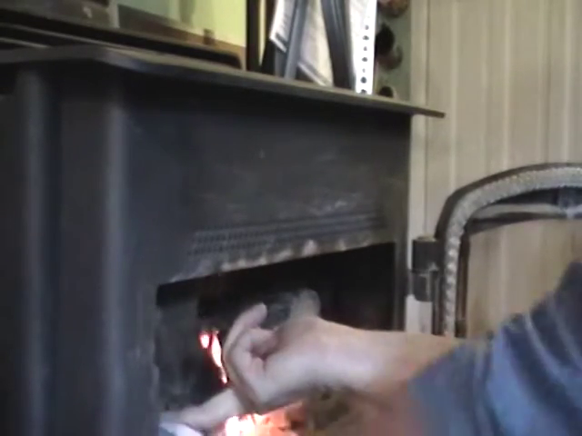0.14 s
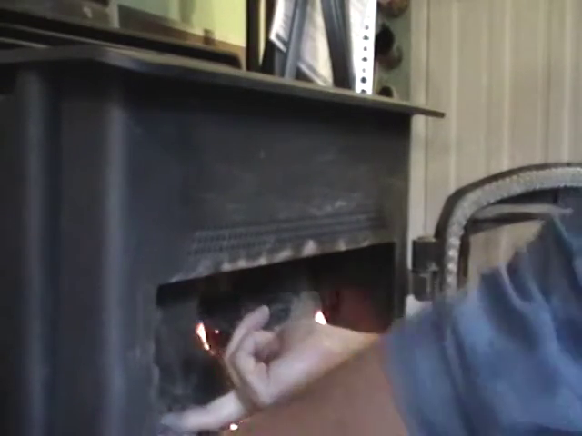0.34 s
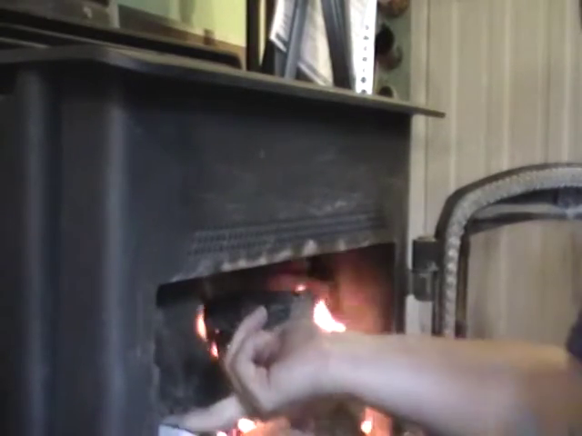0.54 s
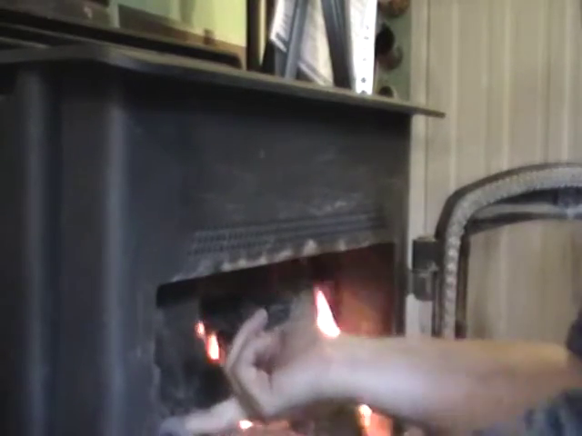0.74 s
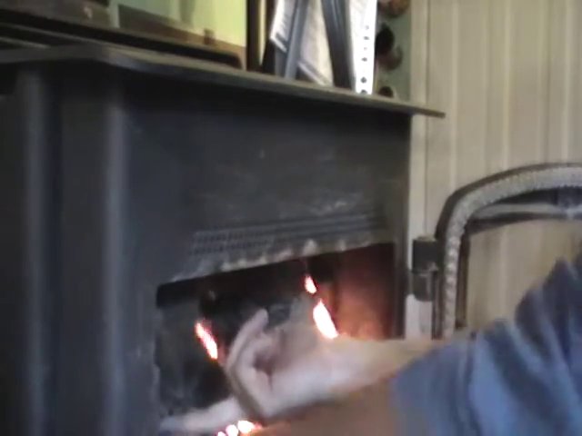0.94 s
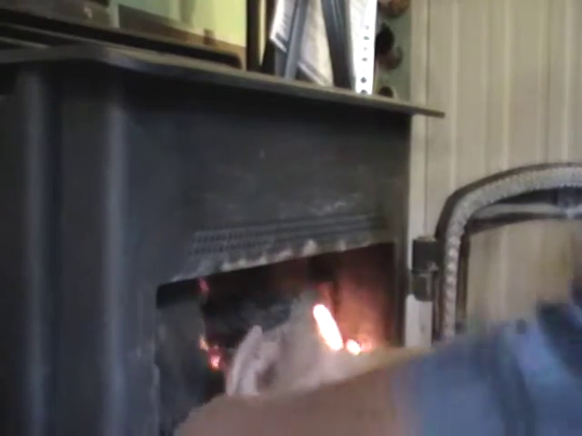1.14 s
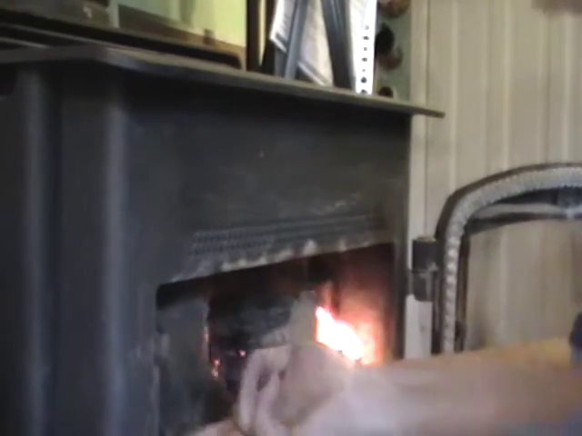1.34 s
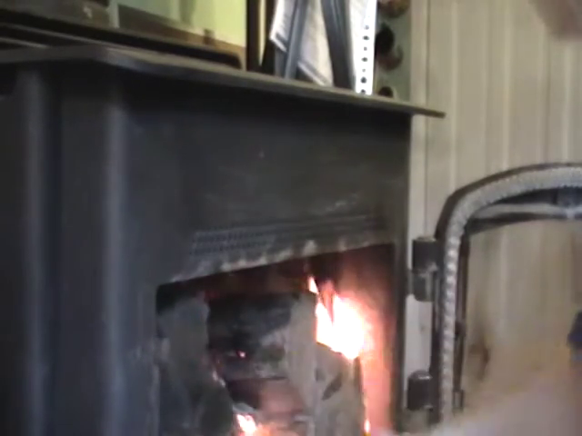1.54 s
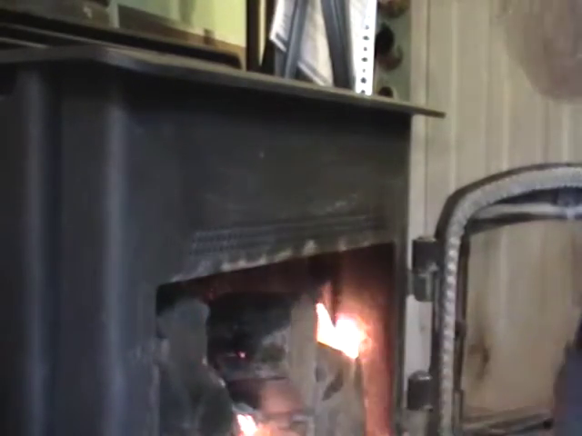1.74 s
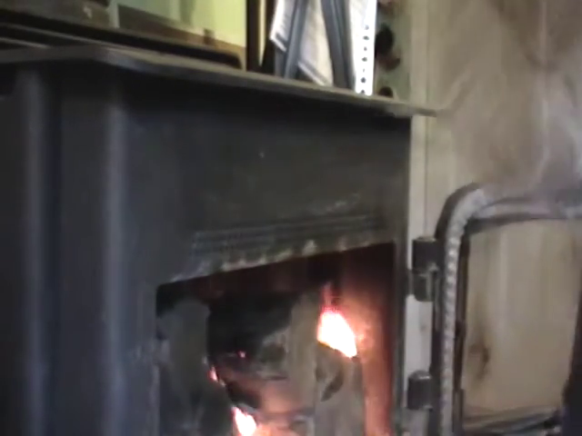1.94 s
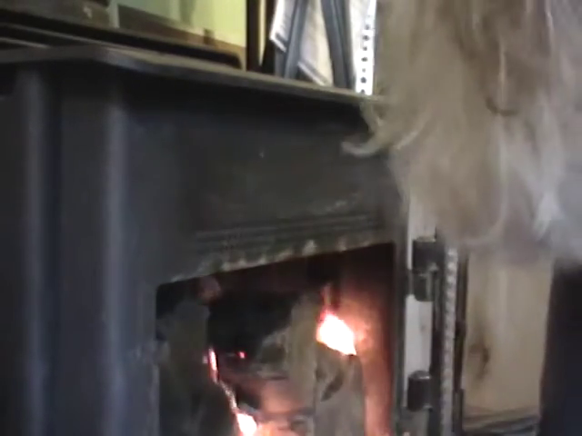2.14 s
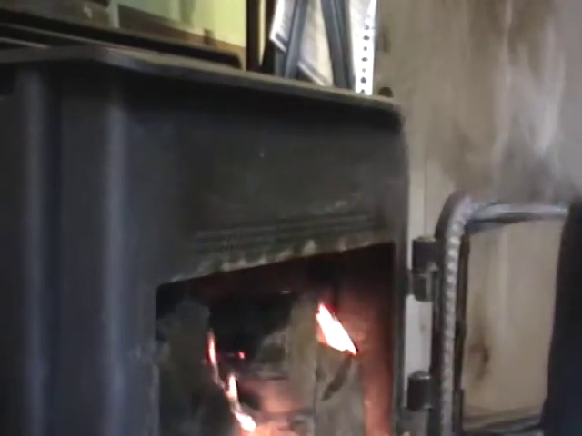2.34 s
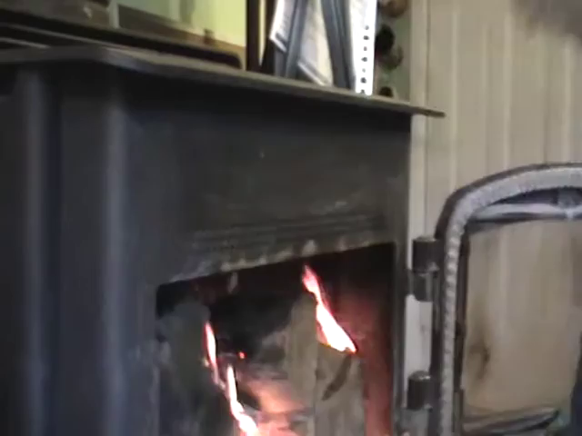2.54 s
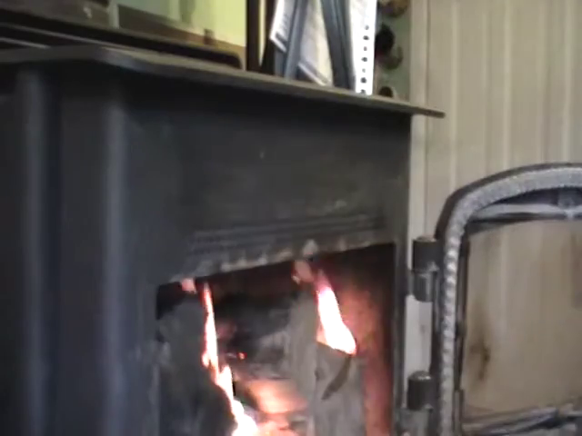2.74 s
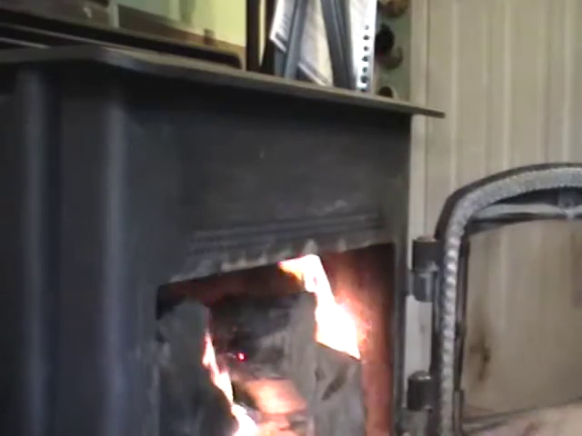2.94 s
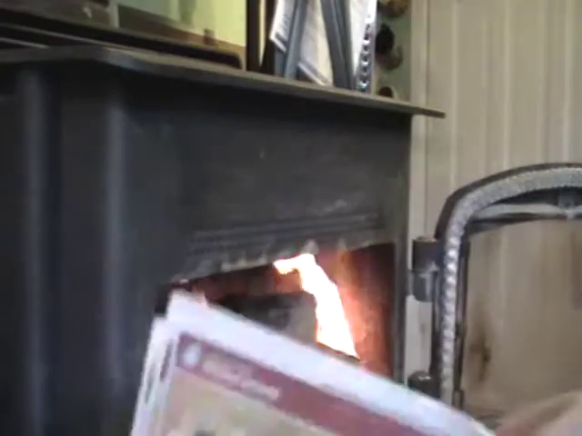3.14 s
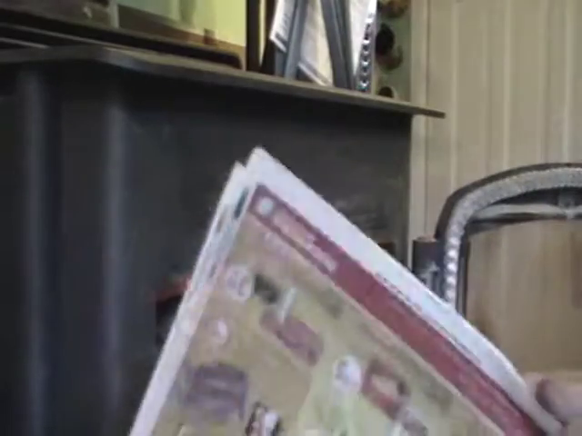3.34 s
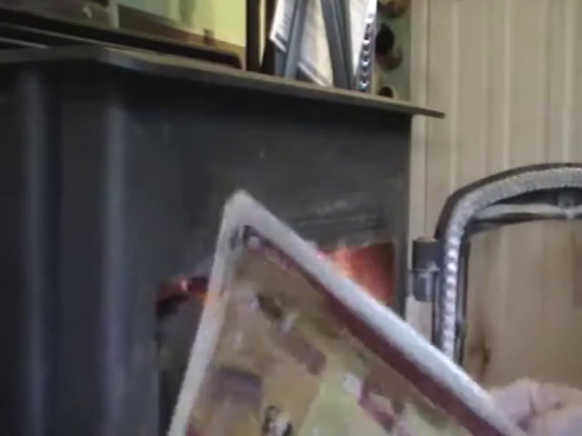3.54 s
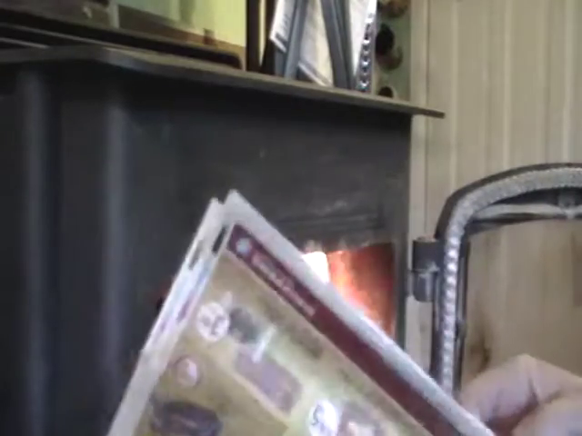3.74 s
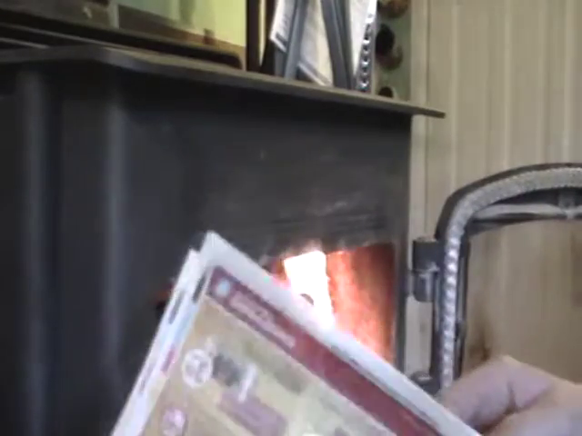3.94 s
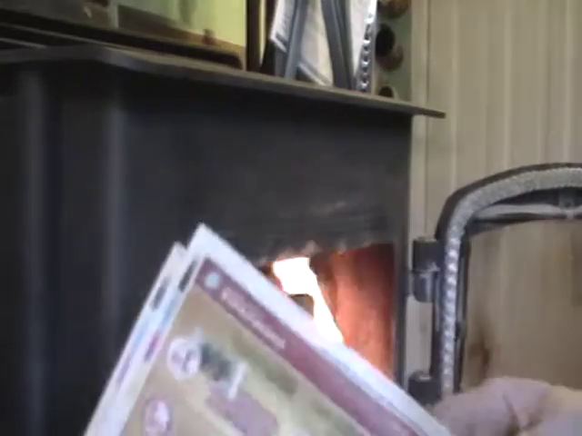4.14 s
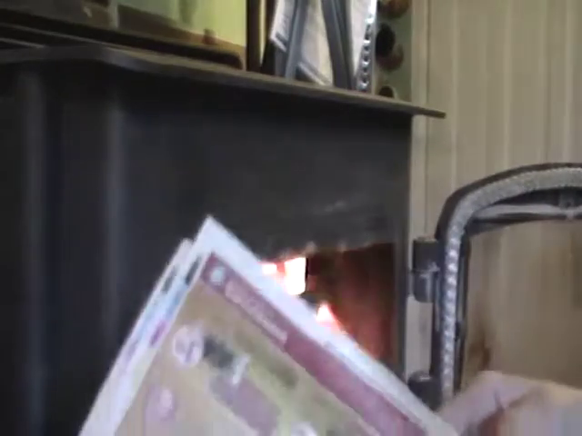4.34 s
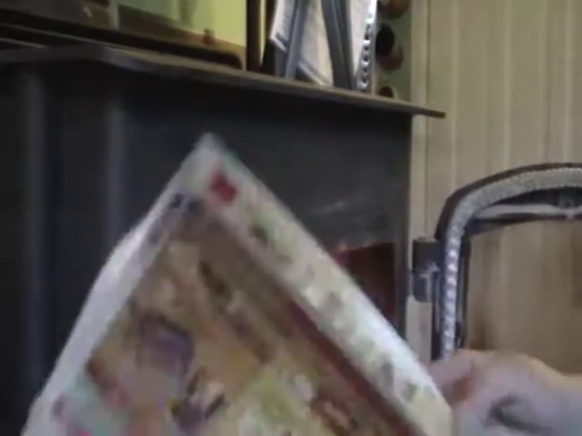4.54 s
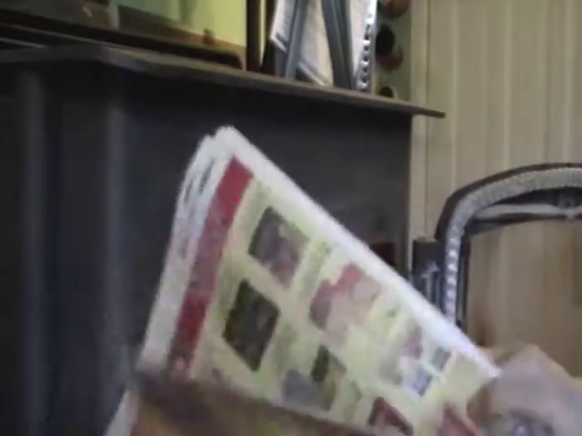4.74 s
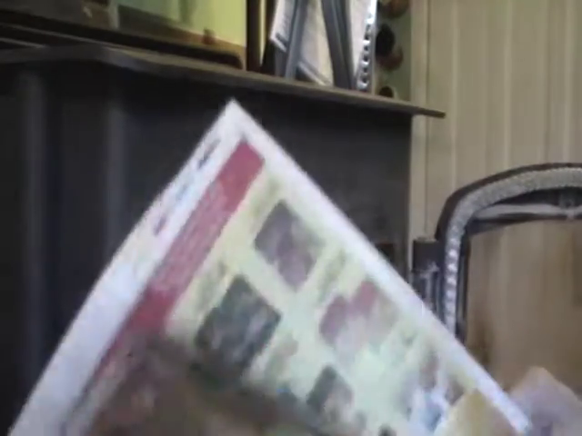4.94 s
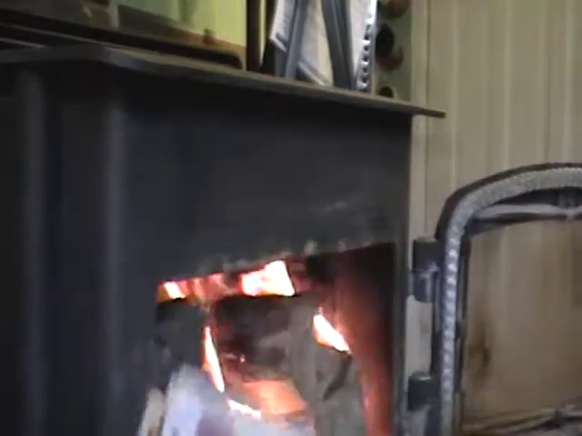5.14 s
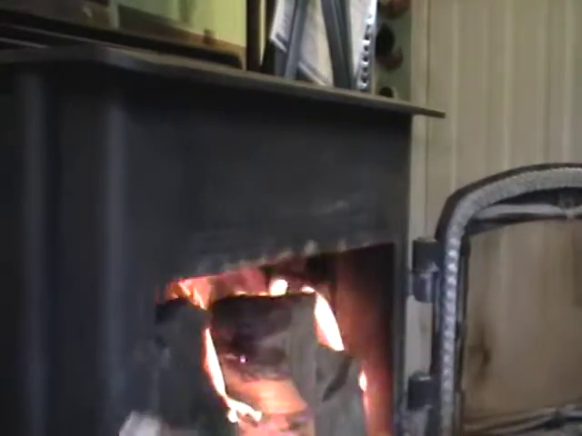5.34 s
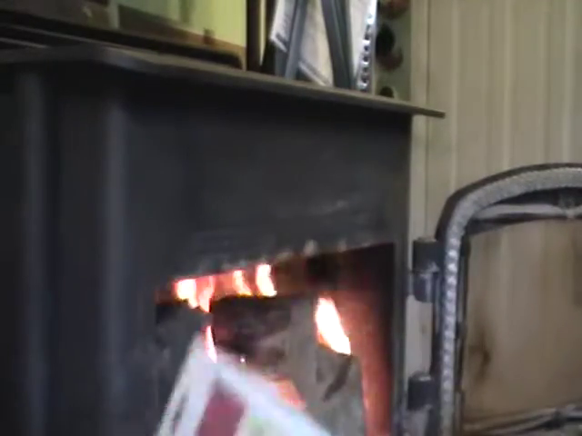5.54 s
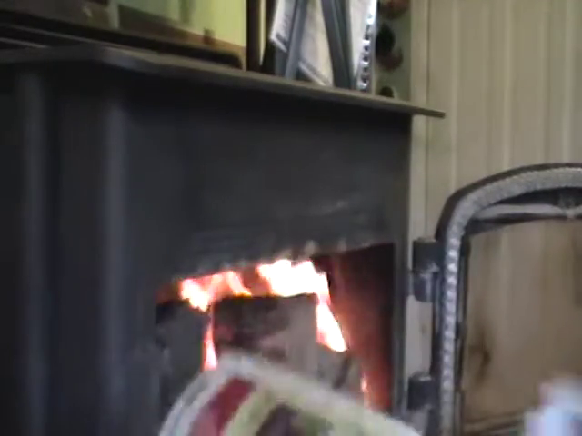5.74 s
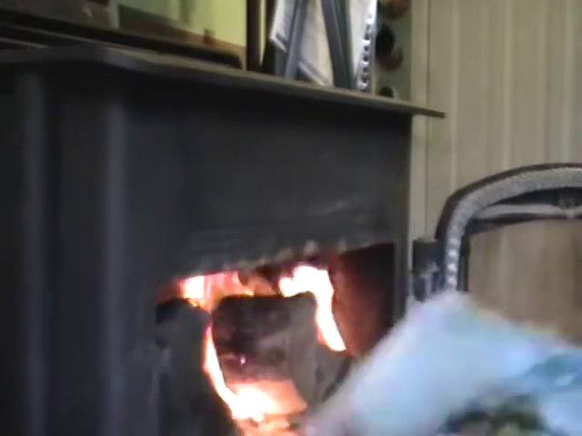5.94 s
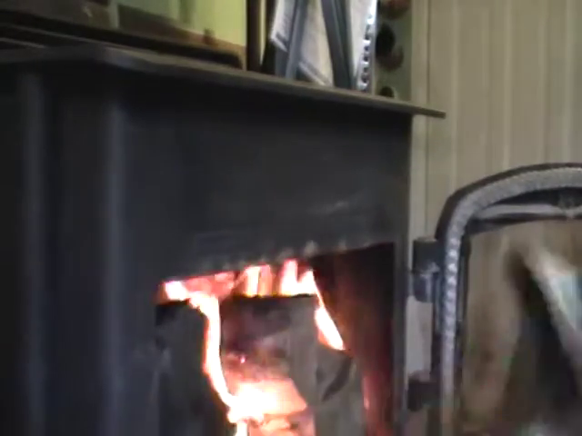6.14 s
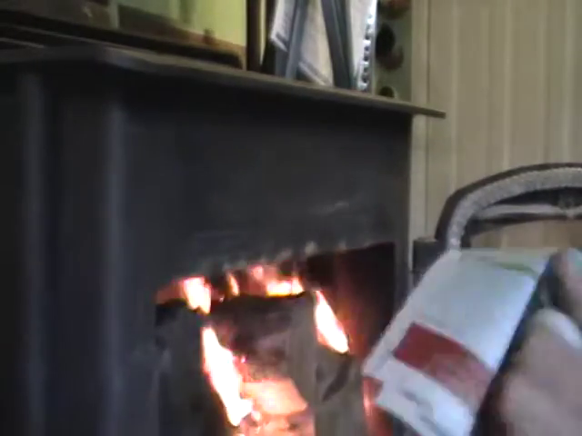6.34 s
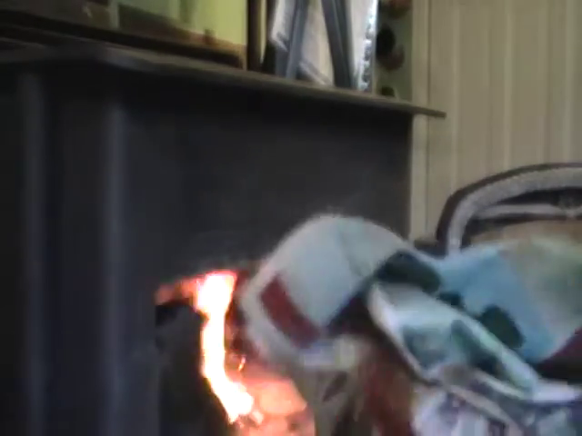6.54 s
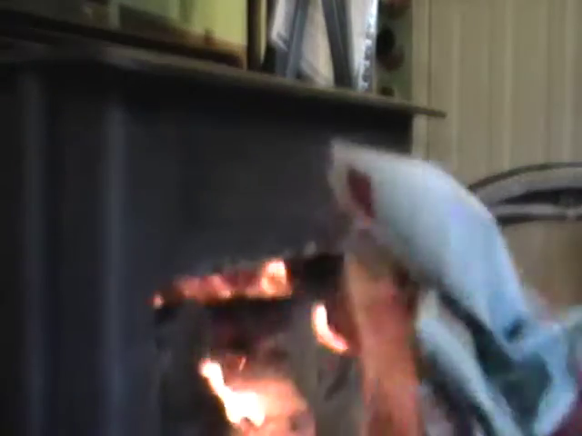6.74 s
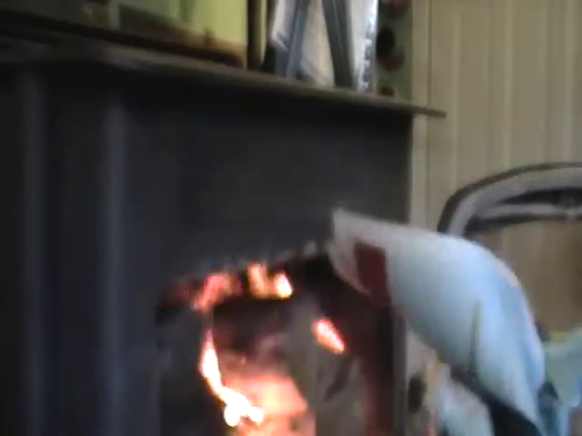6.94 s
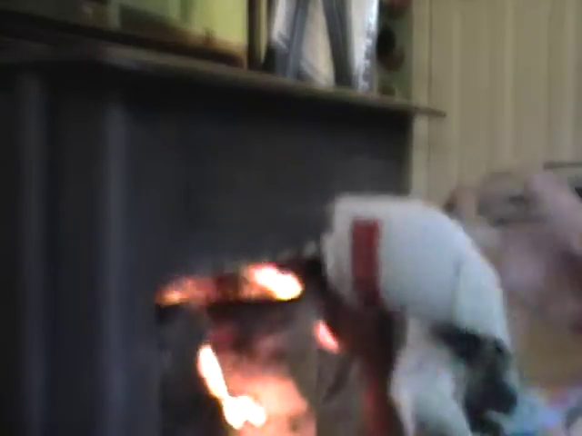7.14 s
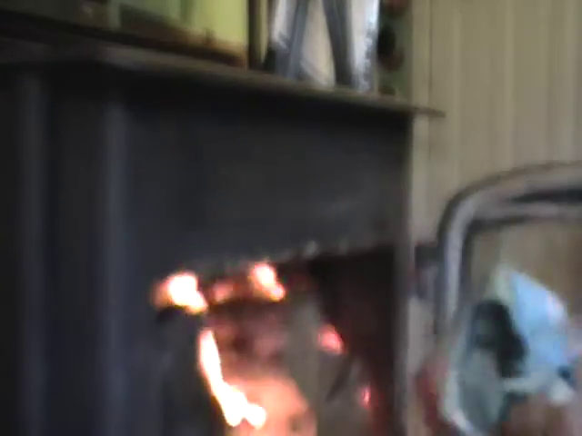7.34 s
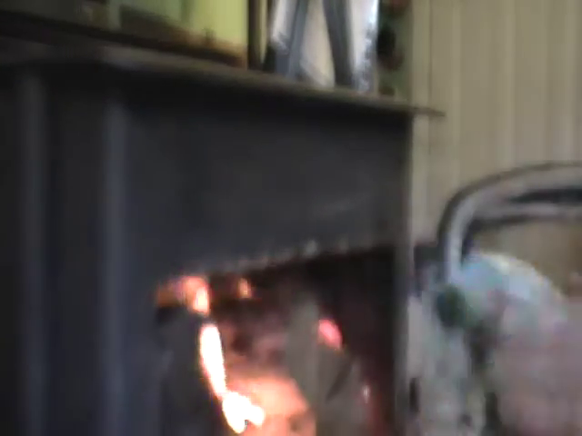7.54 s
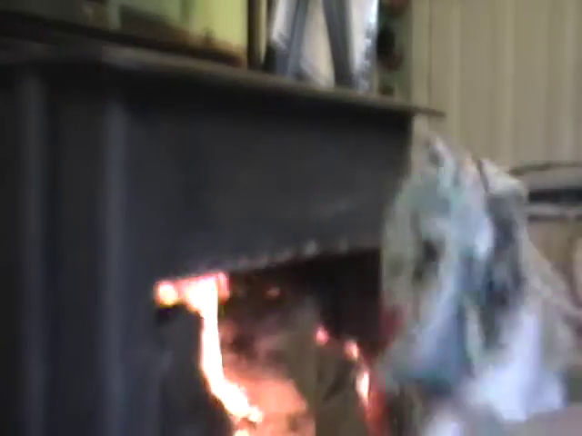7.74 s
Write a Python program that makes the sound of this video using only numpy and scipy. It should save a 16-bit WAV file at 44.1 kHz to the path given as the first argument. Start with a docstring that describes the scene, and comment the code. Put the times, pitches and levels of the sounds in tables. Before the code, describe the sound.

Close up in a small indoor room, newspaper rustles and crackles briskly as it is pushed into a stove, then fades to faint brushing. A few soft bumps and flaps follow as more sheets are handled. Bending grows sharper, then the paper is crushed hard in dense, loud, snapping bursts that ease near the end. A low, soft draught wavers steadily underneath.

```python
"""Newspaper rustles in a burning wood stove; then more is slid up, bent and crushed hard.
Sheets rub with a fine hiss of shaped noise; creases buckle in showers of tiny random clicks that ring
stiff patches of paper. Large creases snap one by one; sheets flap, bump and scuff in short noise bursts.
The stove draws softly underneath as a low, wavering rush, in a small room with a short echo.
"""
import sys
import numpy as np
from scipy import signal
from scipy.fft import rfft, irfft
from scipy.io import wavfile
from scipy.ndimage import uniform_filter1d

SR = 44100
rng = np.random.default_rng(int(sys.argv[2]) if len(sys.argv) > 2 else 0)


def dump(signal):
    """Clip the signal to [-1, 1] and save it as 16-bit WAV at the path in sys.argv[1]."""
    limited = np.clip(np.atleast_2d(signal).T, -1, 1)
    pcm = np.round(limited * 32767).astype(np.int16)
    wavfile.write(sys.argv[1], SR, pcm)


N = 343539
SIZE = 360000  # transform length in samples, with room for the tails
TIME = np.arange(N) / SR

# basic tone of buckling paper, shared by the showers and the single snaps: pitch_hz, level_db (per Hz)
BUCKLING_TONE = [(30, -53), (65, -14), (150, -15), (300, -2.5), (480, -1), (700, -2.5), (1200, 1),
                 (2500, 1), (5600, 0), (7500, -5), (10000, -12), (15500, -27.5)]


def amp(db):
    """Turn decibels into a gain."""
    return 10 ** (np.asarray(db) / 20)


def unit(x):
    """Scale to an average (rms) level of 1."""
    return x / np.sqrt(np.mean(x ** 2) + 1e-18)


def frequencies(size):
    """Frequencies of a transform in Hz, with zero raised to 1 to keep divisions safe."""
    return np.maximum(np.arange(size // 2 + 1) * SR / size, 1)


FREQ = frequencies(SIZE)


def curves(table):
    """Join each column of a timed table by straight lines."""
    s, *columns = np.transpose(table)
    return [np.interp(TIME, s, c) for c in columns]


def response(points, size=SIZE):
    """Filter through (Hz, dB) points that responds only after its input, with the least delay."""
    hz, db = np.transpose(points)
    level_db = np.interp(np.log(frequencies(size)), np.log(hz), db)
    # folding the cepstrum forward in time gives the matching phase
    cepstrum = irfft(np.log(amp(level_db)))
    cepstrum[1:size // 2] *= 2
    cepstrum[size // 2 + 1:] = 0
    return np.exp(rfft(cepstrum))


def through(x, gain):
    """Filter by a frequency response."""
    return irfft(rfft(x, SIZE) * gain)[:N]


def walk(rate):
    """Smooth random wander, drawing a new value rate times a second, with a spread near 1."""
    k = max(int(SR / rate), 2)
    steps = np.repeat(rng.standard_normal(N // k + 1), k)
    return unit(uniform_filter1d(steps, k)[:N])


def add(out, s, x):
    """Mix a short sound in at time s."""
    i = int(np.clip(s * SR, 0, N - 1))
    out[i:i + len(x)] += x[:N - i]


def facet(f, hz, q, leak):
    """A stiff patch of paper: a damped resonance with steep skirts, plus the crease's broad click (leak)."""
    return leak + 1 / (1 + 1j * q * (f / hz - hz / f)) ** 2


def unzip(run_s, size=256):
    """A crease gives way in a fading run of tiny jerks, which lends the snap its own colour."""
    return unit(rng.standard_normal(size) * np.exp(-np.arange(size) / (run_s * SR)))


def bending(f, lag_s=0.000701):
    """Bending waves cross the sheet more slowly at low pitch; lag_s is their travel time at 1 kHz."""
    return np.exp(-4j * np.pi * lag_s * np.sqrt(f * 1000))


def draught():
    """Air drawn through the fire: shaped noise makes a low, slightly wavering rush."""
    # tone of the rush: pitch_hz, level_db (per Hz)
    draught_tone = [(25, -22), (60, -2), (105, 6), (150, 1), (240, -10), (350, 3.5), (520, -2.5),
                    (720, -5.5), (1100, -6), (2000, -15), (5500, -20), (15000, -55)]
    level_db, waver_db = -57, 1.2 * walk(9)
    rush = unit(through(rng.standard_normal(N), response(draught_tone)))
    return rush * amp(level_db + waver_db)


def strokes(table, edges, rounding=1.3):
    """Hand movements: each starts, holds while it swells or sags, and lets go; gives three powers over time."""
    attack_s, release_s = edges
    power = np.zeros((3, N))  # the whole, its body, its treble
    for s, hold_s, db, swell_db, body_db, treble_db in table:
        near = abs(TIME - s - hold_s / 2) < hold_s / 2 + .5
        t = TIME[near] - s
        outside = np.maximum(-t, 0) / attack_s + np.maximum(t - hold_s, 0) / release_s
        swell = amp(db + swell_db * np.clip(t / hold_s, 0, 1))
        gain = np.exp(-outside ** rounding) * swell
        power[:, near] += np.outer(amp([0, body_db, treble_db]), gain) ** 2
    return power


def sliding(grain_db=1.5, catch_db=1.54, shift_db=-0.5):
    """Sheet over sheet: fine fibre slips catch and release while the contact patch shifts its tone."""
    # tone of the hiss: pitch_hz, level_db (per Hz)
    sliding_tone = [(30, -50), (65, -19.5), (130, -8), (250, -12.5), (480, -9.5), (750, -3.5), (1500, 0),
                    (3500, 1), (5500, 1), (7500, -7), (10000, -12), (15500, -24)]
    slips = rng.standard_normal(N) * amp(grain_db * walk(1500) + catch_db * walk(90))
    pitches = np.geomspace(400, 9000, num=5)
    rings = [abs(facet(FREQ, hz, 0.59, 0)) ** 2 for hz in pitches]
    colour = response(sliding_tone) / sum(rings)
    # each pitch band wanders in level on its own
    return unit(sum(through(slips, ring * colour) * amp(shift_db * walk(35)) for ring in rings))


def buckling(rate):
    """Showers of tiny buckles of very uneven size, each ringing one of many facets."""
    q, leak, run_s = 1.16, 0.093, 0.00071
    spread_db, cap = 7, 1.72  # cap, in spreads, limits the strongest buckles
    trail_s, trail = 0.0032, 0.58
    bursts = np.exp(.5 * walk(70))  # the showers thicken and thin at random
    fall = np.exp(-1 / (trail_s * SR))
    out, power = 0, 0
    pitches = np.geomspace(1000, 12000, num=12)
    for hz in pitches:
        hit = rng.random(N) < rate * bursts / SR / len(pitches)
        uneven_db = spread_db * (hz / 3000) ** 0.14  # small stiff facets differ most in strength
        strength = amp(uneven_db * np.minimum(rng.standard_normal(N), cap))
        kicks = hit * strength * rng.choice([-1, 1], N)
        # fibres go on slipping for a few milliseconds after each buckle
        slip_power = signal.lfilter([1 - fall], [1, -fall], kicks ** 2 + 1e-18)
        fibres = np.sqrt(slip_power) * rng.standard_normal(N)
        ring = facet(FREQ, hz, q, leak) * rfft(unzip(run_s), SIZE)
        out = out + rfft(kicks + trail * fibres, SIZE) * ring
        power = power + abs(ring) ** 2
    x = irfft(out / np.sqrt(power) * response(BUCKLING_TONE) * bending(FREQ))[:N]
    # the hands feed in energy steadily, however it is shared between the buckles
    recent_power = np.abs(uniform_filter1d(x ** 2, int(0.0307 * SR)))
    return x / np.sqrt(recent_power + 1e-12)


def rustle(slide, squeeze):
    """Sliding hiss and buckling showers, mixed and coloured by the work of the hands."""
    # share of the power that is buckling (0-1), and buckles per second before random bursts
    slide_share, slide_rate = 0.21, 1300
    squeeze_share, squeeze_rate = 0.54, 680
    firm_db, rate_doubles_db = -20, 29  # squeeze_rate holds at firm_db and doubles every 29 dB above
    resting_db = -61.5  # paper settling between the strokes
    slide_db, body_hz, treble_hz = 1.5, 850, 6500

    power, body_power, treble_power = slide + squeeze + amp(resting_db) ** 2
    slid = slide[0] / power
    effort_db = 10 * np.log10(power) - firm_db
    share = slid * slide_share + (1 - slid) * squeeze_share
    rate = slid * slide_rate + (1 - slid) * squeeze_rate * 2 ** (effort_db / rate_doubles_db)
    x = amp(slide_db) * np.sqrt(1 - share) * sliding() + np.sqrt(share) * buckling(rate)
    body = through(x, 1 / (1 + (FREQ / body_hz) ** 4))
    treble = through(x, 1 / (1 + (treble_hz / FREQ) ** 6))
    middle = x - body - treble
    return np.sqrt(power) * middle + np.sqrt(body_power) * body + np.sqrt(treble_power) * treble


def snaps(table, size=2048):
    """A large crease flips within a cycle or two of its facet; smaller ones crackle after it."""
    q, leak, edge_hz = 0.69, 0.23, 10000
    rise_s, trail_s, grain_db = 0.00024, 0.0034, 6
    trail_q, trail_pitch = 0.21, 0.55  # the crackle rings broader and lower than the snap
    out, t, f = np.zeros(N), np.arange(size) / SR, frequencies(size)
    paper = response(BUCKLING_TONE, size=size) * bending(f, lag_s=0.000396)
    edge = 1 + (f / edge_hz) ** 2  # the fold itself cracks brighter than the sheet rustles
    millisecond = np.sqrt(SR / 1000 / size)  # sets the crack's energy as if it filled one millisecond
    for s, db, hz, crackle_db in table:
        # a crease that flips alone, with little crackle after it, rings its facet more purely
        purity = 1 + np.clip(-crackle_db / 14, 0, 1)
        ring = facet(f, hz, q * purity, leak / purity)
        run = rfft(unzip(1 / hz), size)  # jerks fade over one cycle of the facet
        crack = unit(irfft(run * paper * ring * edge))

        noise, strength = rng.standard_normal((2, size))
        fade = np.exp(-t / trail_s) * (1 - np.exp(-t / rise_s))
        grains = noise * amp(grain_db * np.minimum(strength, 2)) * fade
        trail_ring = facet(f, trail_pitch * hz, trail_q, 2 * leak)
        crackle = unit(irfft(rfft(grains) * paper * trail_ring * np.sqrt(edge)))
        add(out, s - .0004, amp(db) * millisecond * (crack + amp(crackle_db) * crackle))
    return out


def creases(power, count=64):
    """Lesser creases give way at random, crowding where the squeeze is hardest; rows for snaps()."""
    over_db, spread_db = 7, 2  # level above the squeeze, and its random spread
    middle_hz, spread_octaves, crackle_db = 3650, 0.37, -7
    work = np.cumsum(power ** 0.4)
    at = np.searchsorted(work, work[-1] * (np.arange(count) + rng.random(count)) / count)
    rows = []
    for i, (strength, pitch) in zip(at, rng.standard_normal((count, 2))):
        level_db = 10 * np.log10(power[i] + 1e-18) + over_db + spread_db * strength
        rows.append((TIME[i], level_db, middle_hz * 2 ** (spread_octaves * pitch), crackle_db))
    return rows


def flaps(q=0.77, rise_s=0.0024, size=8192):
    """Sheets flap, bump and scuff: short damped noise bursts, mostly low, a few near 2 kHz."""
    # flaps, bumps and scuffs: start_s, peak_db, pitch_hz, decay_s
    flap_list = [(0.791, -37.5, 135, 0.02), (1.812, -34.5, 454, 0.0094), (2.652, -27.5, 134, 0.01),
                 (2.676, -26.5, 242, 0.021), (2.78, -24.5, 397, 0.003), (2.806, -30, 130, 0.018),
                 (2.831, -29, 180, 0.021), (3.08, -23.5, 540, 0.0025), (3.112, -32, 175, .016),
                 (3.349, -35.5, 840, 0.0042), (3.676, -35.5, 400, 0.0063), (3.911, -30, 410, 0.0055),
                 (4.067, -36, 524, 0.0039), (4.46, -32, 390, 0.0089), (4.62, -27, 2200, 0.017),
                 (4.914, -23, 2090, 0.029), (5.06, -27.5, 390, 0.0078), (5.167, -18.5, 1910, 0.0056),
                 (7.268, -29.5, 191, 0.0066), (7.411, -30.5, 210, 0.015)]
    out, t, f = np.zeros(N), np.arange(size) / SR, frequencies(size)
    for s, db, hz, decay_s in flap_list:
        push = rng.standard_normal(size) * (1 - np.exp(-t / rise_s)) * np.exp(-t / decay_s)
        flap = irfft(rfft(push) * facet(f, hz, q, 0) / (1 + (f / (2 * hz)) ** 4))
        add(out, s - rise_s, amp(db) * flap / abs(flap).max())
    return out


def room(x, size=16384):
    """Quick reflections off the stove front, then the short ring of the room, as fading noise."""
    early_db, early_s = -17, 0.0057
    late_db, split_hz = -13.5, 4000
    low_t60_s, treble_t60_s = 0.53, 0.35  # time to fade by 60 dB
    t = np.arange(size) / SR
    early, late = rng.standard_normal((2, size))
    early = unit(early * (t > .0012) * np.exp(-t / early_s))
    dull = signal.sosfilt(signal.butter(2, split_hz, fs=SR, output="sos"), late)
    bright = 1.1 * (late - dull)
    late = dull * amp(-60 * t / low_t60_s) + bright * amp(-60 * t / treble_t60_s)
    late = unit(late * np.clip((t - .005) / 0.0047, 0, 1))
    echo = (amp(early_db) * early + amp(late_db) * late) / np.sqrt(size)
    return through(x, rfft(echo, SIZE))


def capsules(x, scatter_db=-3.0, phase_db=-4, balance_db=-0.4):
    """Two close microphone capsules hear nearly the same; they part most in the top treble."""
    # basic difference between the capsules: pitch_hz, side_over_middle_db
    width_tone = [(60, -20), (450, -22), (850, -14.5), (1500, -22), (3500, -23), (4300, -21), (7000, -19),
                  (9500, -11), (12000, -3.5), (15000, 1)]
    # the paper sounds narrow at first, then wider as it is handled: start_s, added_width_db
    off_axis = [(0, -4.5), (.9, -2), (1.4, 5), (4.2, 0), (5.5, 1.5)]
    width = response(width_tone)
    off_axis_db, = curves(off_axis)
    scatter = through(x * walk(120), width)  # crackles come from shifting spots on the sheet
    phase = through(x, 1j * abs(width))  # the capsules differ slightly in phase
    side = amp(off_axis_db) * (amp(scatter_db) * scatter + amp(phase_db) * phase)
    return np.array([(x + side) * amp(balance_db / 2), (x - side) * amp(-balance_db / 2)])


def scene(diffuse_db=-10):
    """Paper at the stove, heard with the room, over a draught that spreads to both sides."""
    # sheets drawn over each other; body is the low part from large loose sheets, treble from sharp edges:
    # start_s, hold_s, level_db (before mixing), swell_db (over the hold), body_db, treble_db
    slides = [(0.0, 0.25, -21, -8, 3, -1), (.4, .08, -31.5, -2.5, 1.5, 0.5),
              (1.07, 0.072, -36.5, 3.5, 3.5, 1.5), (1.61, 0.19, -57.5, 0.5, 17, 6),
              (1.85, 0.22, -62, -2, 15.5, -4), (2.095, 0.24, -35.5, -5, 8.5, 0.5),
              (2.36, 0.4, -39, 4, 4.5, 0.5), (2.86, .2, -43, 7, 7, 5), (3.11, 0.094, -30.5, -1.5, 5, 2),
              (3.72, .18, -44.5, 3, 1, 4), (4.17, 0.061, -50.5, 12, -5, 5),
              (4.33, 0.092, -52.5, 17, 1, -0.5), (4.52, 0.081, -42.5, 0.5, 5.5, -3)]
    # paper bent or squeezed: same columns and units as the slides
    squeezes = [(.595, .02, -29, -2, 5, 1), (.65, .15, -28, 3, 3.5, -3), (.83, .11, -30, -2.5, -0.5, -6),
                (1.36, .16, -51, -2.5, 3, 1), (3.3, .19, -45, -2, 3, 3.5), (3.53, .16, -53, 3, 1, 7.5),
                (4.0, .15, -46.5, -4.5, -2, 2), (4.465, .08, -31, -8, -4, 1), (4.61, .18, -36, -0.5, 1, -1),
                (4.82, .03, -26, -2, -0.5, -2.5), (4.9, .24, -38.5, 5, 2.5, -2),
                (5.165, .08, -29, 1.5, 1, -7), (5.29, 0.17, -33, 5, -0.5, -2),
                (5.52, .01, -27.5, -0.5, 2, -1), (5.575, .08, -16, -1, -3, -7),
                (5.69, .15, -20, -1, -2.5, -3), (5.9, .02, -20.5, -1, 3, -1),
                (5.96, .07, -19, -5.5, 3.5, 3), (6.1, .05, -21.5, 4.5, 4.5, 0),
                (6.168, .06, -12.5, -5.5, -2, -3.5), (6.27, .14, -20, -4, 1.5, -2.5),
                (6.45, .04, -30.5, 1, 3, 1.5), (6.51, .14, -20, -1, 0, -.5), (6.68, .1, -24, 0.5, -1, 3.5),
                (6.8, .21, -22, 1, -1.5, -1), (7.05, .19, -29, -1, 3.5, -5),
                (7.115, .015, -23, 0, 0.5, -13), (7.283, .015, -14, -1, -0.5, -1.5),
                (7.335, .11, -20, 3, -0.5, -1.5), (7.48, .05, -23.5, -2, -1, -1),
                (7.56, .008, -20, 0, 0, 0), (7.685, .05, -37, -1, 10.5, 6), (7.775, .02, -26.5, 0, 1, 5.5)]
    # single loud creases snapping through:
    # start_s, level_db (as if filling 1 ms), pitch_hz (of the facet), crackle_db (against the snap)
    loud_snaps = [(0.0543, -13.5, 4100, -2), (0.184, -14.5, 4370, -5), (0.3194, -17.5, 3400, -22),
                  (0.41, -20.5, 4560, -14), (0.5917, -26, 4500, 6), (0.614, -27, 4540, -6),
                  (0.6524, -19.5, 3900, 1.5), (0.6983, -19.5, 3900, -8), (0.7348, -13.5, 3800, -6),
                  (0.797, -8, 4770, -14), (0.934, -17.5, 5040, -8), (1.0361, -26.5, 3500, -6),
                  (1.19, -24.5, 3900, -4), (1.3382, -32, 5300, -12), (1.3678, -31.5, 3200, -1),
                  (1.475, -33, 3620, 4.5), (1.7263, -38, 5700, -5), (1.7535, -35.5, 5930, -15),
                  (1.814, -44.5, 2120, 12), (1.892, -30, 1960, -0.5), (2.5014, -25.5, 2000, 6.5),
                  (2.6621, -17.5, 1960, -1.5), (2.7806, -9, 5200, -7), (3.092, -14.5, 5400, -3),
                  (3.4266, -25, 4000, 7.5), (3.6787, -36.5, 2000, 3), (3.9114, -28, 1300, 4),
                  (3.9952, -25.5, 2550, -21), (4.0734, -26.5, 1130, -1), (4.235, -30.5, 2600, 3),
                  (4.4588, -10.5, 6000, -2), (4.679, -27, 5900, 7), (4.7346, -13.5, 3560, -10),
                  (4.826, -16.5, 3200, -14), (5.0593, -12, 2750, 4), (5.1644, -14, 2400, -11),
                  (5.2144, -19, 3780, 5), (5.2353, -14.5, 2640, -5), (5.3874, -14, 3840, 1.5),
                  (5.4161, -8.5, 4860, -10), (5.5217, -12, 3800, -6), (5.558, -7, 4830, -11),
                  (5.6105, -10, 3600, -5), (5.624, -8, 4800, -3), (5.6673, -4.5, 5400, -10),
                  (5.757, -10.5, 2090, 2), (5.801, -6, 2540, -13), (5.832, -8, 3100, 0.5),
                  (5.8369, -9.5, 4060, -0.5), (5.9045, -13, 2800, 5), (5.9572, -12, 2880, 1),
                  (5.9741, -7, 2630, -1), (6.0174, 2, 3850, -18), (6.0379, -3.5, 5260, -9),
                  (6.0924, -4.5, 4200, -5), (6.192, -2.5, 4700, -1), (6.2132, -3.5, 4860, -1),
                  (6.289, -8.5, 4800, -7), (6.3546, -6, 2390, -2.5), (6.3901, -8, 1820, -5),
                  (6.419, -9.5, 3250, 0), (6.632, -12.5, 3360, 2), (6.7505, -7.5, 5260, -3.5),
                  (6.7998, -7, 3280, 2), (6.857, -11, 4400, -6), (6.9159, -9, 4800, -11),
                  (6.9349, -13, 3300, 4), (7.0151, -13, 2700, -18), (7.1283, -9, 2600, -14),
                  (7.2717, -19, 3100, -7), (7.5814, -20.5, 4430, 7), (7.696, -32, 1850, 14),
                  (7.7191, -23, 3160, -6), (7.782, -19.5, 3480, 7.5)]
    # edges are attack and release in seconds: a squeeze grips and lets go faster than a slide
    slide = strokes(slides, edges=(0.026, 0.054))
    squeeze = strokes(squeezes, edges=(0.013, 0.032))
    paper = rustle(slide, squeeze) + snaps(loud_snaps) + snaps(creases(squeeze[0])) + flaps()
    # a second, softer draught with opposite sign left and right widens the first
    air = draught() + amp(diffuse_db) * draught() * np.array([[1], [-1]])
    return capsules(paper + room(paper)) + air


def record(dry):
    """A camcorder rounds off the sharpest peaks and cuts the treble above 15.9 kHz."""
    rounded = dry / (1 + (dry / .93) ** 4) ** (1 / 4)
    return signal.sosfilt(signal.ellip(10, .2, 70, 15900, fs=SR, output="sos"), rounded)


dry = scene()
out = record(dry)
dump(out)
```